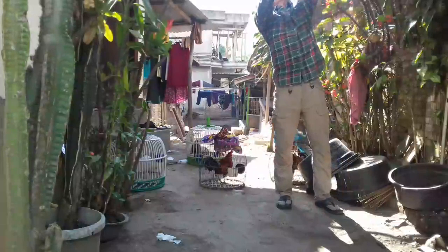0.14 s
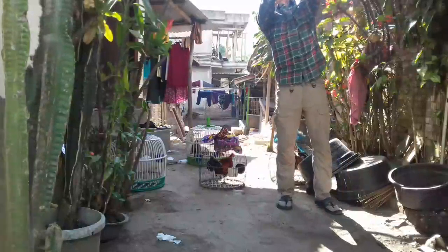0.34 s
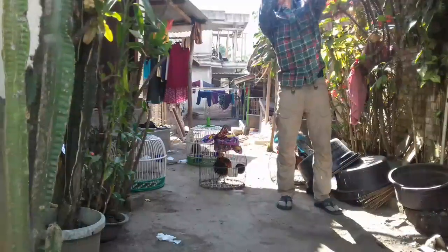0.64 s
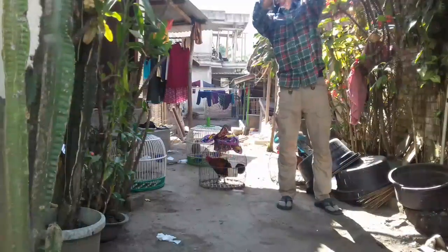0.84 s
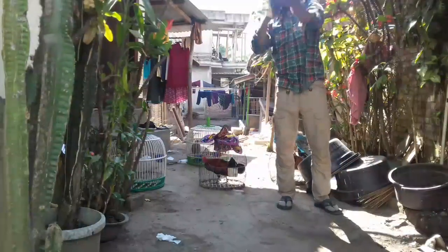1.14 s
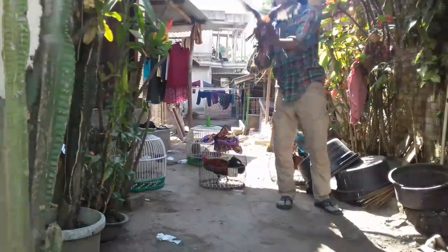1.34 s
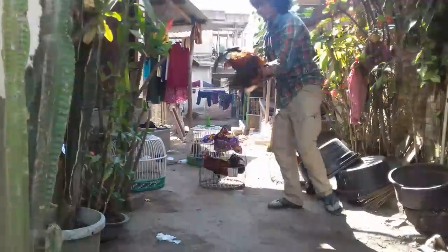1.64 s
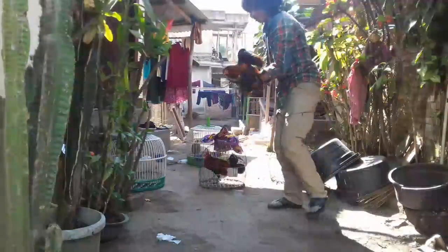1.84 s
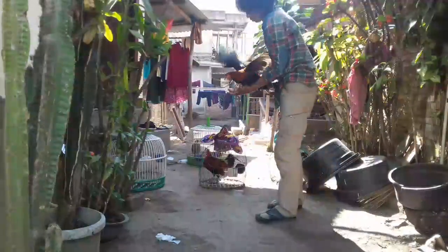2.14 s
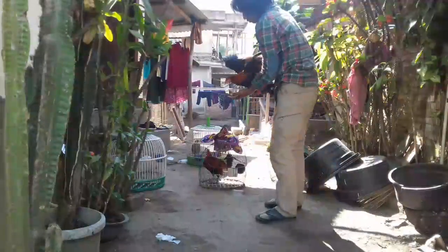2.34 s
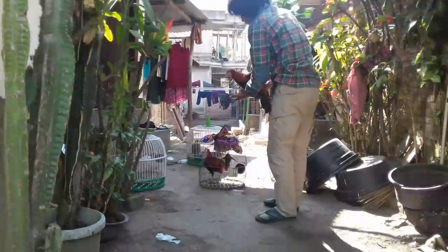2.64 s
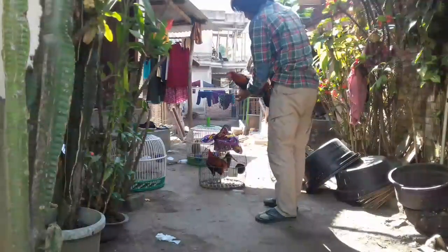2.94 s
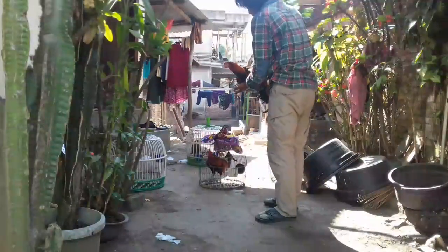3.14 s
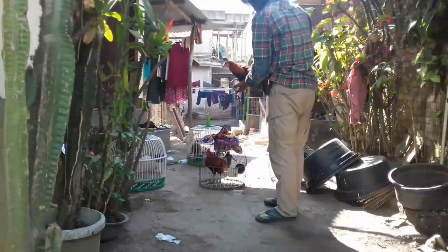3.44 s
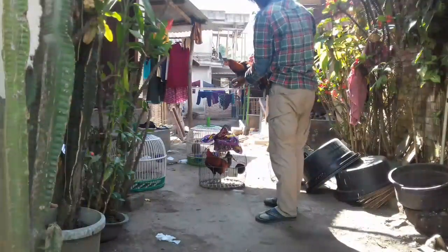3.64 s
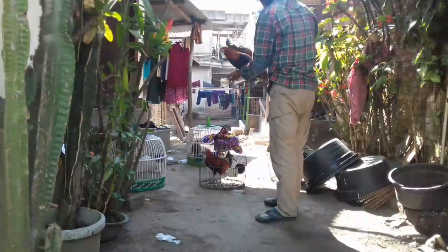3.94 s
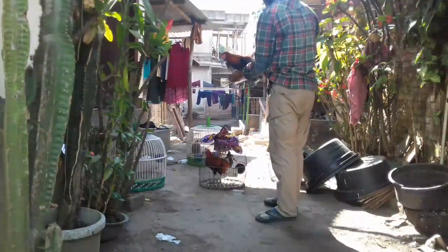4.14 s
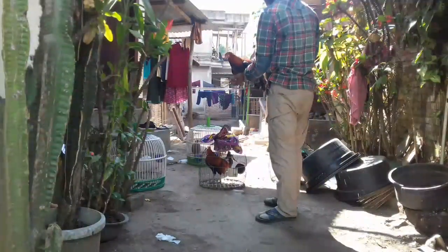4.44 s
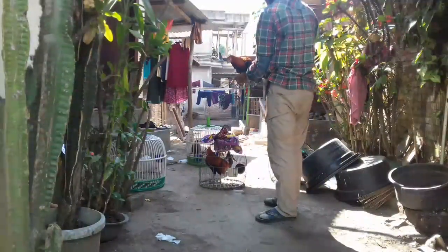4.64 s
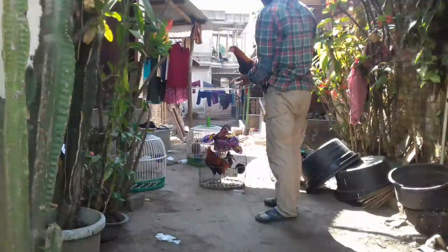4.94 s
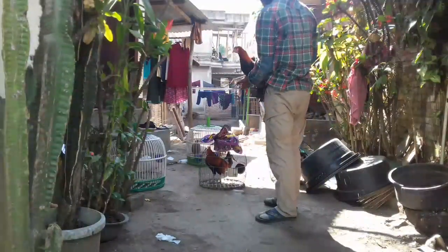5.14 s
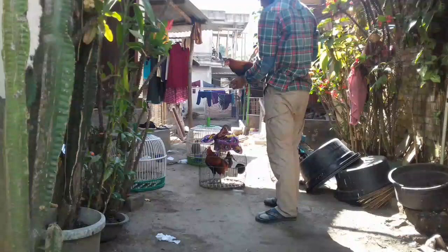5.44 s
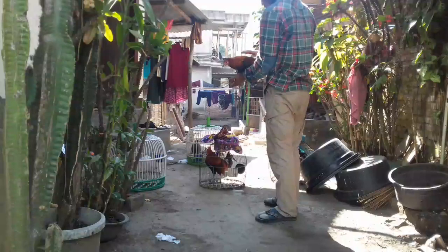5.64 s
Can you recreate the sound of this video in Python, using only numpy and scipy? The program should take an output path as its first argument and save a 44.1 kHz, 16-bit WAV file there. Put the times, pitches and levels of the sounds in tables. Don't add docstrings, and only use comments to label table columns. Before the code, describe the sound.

In a hard-walled yard, a bird held fairly close beats its wings with dry feather rattles and low air puffs, yelping, whistling and squawking for a second and a half. It then settles into spaced clucks, hoarser and quieter, ending in faint mutters. A second hen answers low and farther off, and thin chick peeps fall in pitch. Quiet town hum; a small microphone dulls the treble.

```python
import sys
import numpy as np
from scipy import signal
from scipy.fft import rfft, irfft, next_fast_len
from scipy.io import wavfile
from scipy.ndimage import uniform_filter1d

SR = 44100
rng = np.random.default_rng(int(sys.argv[2]) if len(sys.argv) > 2 else 0)


def put_to_file(sound):
    columns = np.atleast_2d(sound).T
    safe = np.clip(columns, -1, 1)
    whole_steps = np.round(safe * 32767)
    wavfile.write(sys.argv[1], SR, whole_steps.astype(np.int16))


def field_ratio(decibels):
    return 10 ** (np.asarray(decibels, dtype=float) / 20)


N = 254898

# (frequency [Hz], density [dB per Hz])
TOWN_SPECTRUM = [(25, -20), (45, 0), (80, -9), (135, 4.5), (195, -6.5), (300, 1.5), (600, -10.5),
                 (1500, -10), (2700, -14), (3700, -19), (4600, -23), (5600, -22), (9000, -25), (15400, -25)]
TOWN_DB = -61.5
# (time [s], level [dB])
FLOCK_STIR = [(0, -36), (.5, -43), (0.999, -41.5), (1.6, -54), (2.701, -51), (3.45, -75.5), (4.2, -56.5),
              (4.7, -65.5), (5.2, -54.5), (5.58, -72.5), (5.78, -48)]
# (time [s], level [dB], decay [s], feather resonance [Hz])
WING_STROKES = [(0, -44.5, 0.1, 1470), (0.034, -26.5, 0.034, 2590), (0.156, -22, 0.016, 3520),
                (0.203, -36.5, 0.15, 4500), (0.293, -27.5, 0.024, 2000), (0.377, -44.5, 0.025, 1485),
                (0.403, -34.5, 0.022, 1500), (0.476, -40.5, 0.02, 1840), (0.515, -49, 0.075, 3020),
                (0.609, -43, 0.037, 3000), (0.632, -32, 0.046, 1486), (0.769, -36, 0.1, 2500),
                (0.856, -26.5, 0.016, 2580), (2.133, -42, 0.013, 1530), (2.958, -48, 0.033, 3500),
                (3.781, -55, 0.086, 2240), (4.091, -43, 0.0091, 1990), (4.115, -48, 0.023, 250),
                (5.201, -55, 0.13, 1520)]
# (time [s], level [dB], length [s])
WING_GUSTS = [(0.106, -46.5, 0.27), (0.304, -45.5, 0.26), (0.592, -40, 0.22), (0.767, -41.5, 0.27),
              (1.102, -42, 0.1), (1.247, -50, 0.17), (1.493, -48, 0.11), (2.04, -54, 0.22)]
GUST_RISE_S, GUST_FALL_S = 0.03, 0.17
# (delay [s], level [dB])
WALL_ECHOES = [(.009, -7.5), (0.022, -4), (0.034, -6.5), (0.061, -11.5), (0.077, -17.5)]

# (time [s], level [dB], membrane rate [Hz], length [s])
YELPS = [
    (.036, -28.5, 809.4, 0.056),
    (.184, -18.5, 824, 0.03),
    (.290, -23.5, 846, 0.024),
    (.836, -21.5, 799, 0.026),
]
WHISTLES = [
    (.164, -17.5, 1649, 0.03),
    (.274, -26, 1570, 0.014),
    (4.998, -28.5, 963, 0.015),
]
CRACKED = [
    (1.026, -18, 1068, 0.057),
    (1.074, -22.5, 1048, 0.038),
]
SQUAWKS = [
    (1.19, -18, 882, 0.0796),
    (1.366, -19.5, 785.7, 0.0694),
]
SHRIEKS = [
    (1.568, -21.5, 739.4, 0.058),
]
CLUCKS = [
    (1.776, -28, 599, 0.048),
    (2.208, -29, 643.4, 0.047),
    (2.414, -28, 633, 0.041),
    (2.610, -27.5, 640, 0.048),
]
HOARSE = [
    (1.997, -32, 583.7, 0.056),
    (2.82, -32, 602, 0.043),
    (3.024, -37, 589.3, 0.052),
    (4.712, -42.5, 580, 0.033),
    (5.018, -33.5, 597, 0.015),
]
MUTTERS = [(3.26, -42, 612, 0.045), (3.485, -41, 637.6, 0.042), (3.718, -42.5, 623, 0.04),
           (3.963, -42, 723.5, 0.047), (4.198, -42, 650, 0.04), (4.443, -43.5, 630.4, 0.042),
           (5.458, -39.5, 627, 0.036), (5.723, -42.5, 586, 0.019)]
BARKS = [
    (5.241, -29, 409, 0.021),
]
# (time [s], level [dB], membrane rate [Hz], length [s])
HEN_CALLS = [(.38, -39.5, 353.8, 0.046), (.635, -41, 312.2, 0.053), (2.05, -37, 259, 0.038),
             (2.77, -47, 259.8, 0.049), (3.01, -42, 332.6, 0.055), (3.63, -42, 398.6, 0.065),
             (4.1, -45.5, 254, 0.024), (4.305, -43.5, 468, 0.073), (4.41, -50.5, 310, 0.062),
             (4.678, -42, 429, 0.065), (4.985, -46, 453.3, 0.058), (5.05, -47, 472, 0.059),
             (5.17, -52.5, 436, 0.068)]
HEN_PURRS = [
    (4.56, -60.5, 628, 0.2),
    (4.81, -62, 691, 0.1),
    (4.925, -53, 525, 0.074),
    (5.365, -51.5, 640, 0.042),
    (5.62, -51, 663, 0.05),
]
# (beak resonance [multiple of membrane rate], upper windpipe resonance [dB],
# rasp above 5 kHz [dB])
MOUTH = dict(whistle=(0.99, -38, -29), yelp=(1.77, -6, 0), squawk=(1.83, -5, -1.4), shriek=(1.95, -6, 3.7),
         cracked=(1.42, -7, -1.8), bark=(3.22, -8.5, -16), cluck=(2.024, -4.5, -20), hoarse=(2.23, -6, -27),
         mutter=(2, -2, -31), hen=(2.27, -22, -19), purr=(1.87, -13, -21))
GAPE_HZ_PER_DB, BRIGHT_DB_PER_DB = 14, 0.67
USUAL_DB = -30
TOP_HZ = 15500

# (time [s], level [dB], start pitch [Hz], length [s])
PEEPS = [(2.546, -60, 4090, 0.15), (2.888, -54.5, 4340, 0.093), (3.035, -54, 4300, 0.076),
         (3.134, -57, 4380, 0.078), (3.606, -56, 4060, 0.029), (3.945, -51, 4080, 0.022),
         (3.989, -47, 4490, 0.031), (4.156, -56.5, 4520, 0.069), (4.302, -56, 4620, 0.045),
         (4.473, -54, 4210, 0.053), (4.541, -51, 4080, 0.038), (4.635, -56, 4110, 0.081),
         (4.828, -53.5, 4340, 0.07), (4.899, -53, 4630, 0.052), (4.967, -54, 4610, 0.037)]
# (time [s], level [dB], start pitch [Hz], length [s])
TWITTERS = [(3.199, -59, 4060, 0.08), (3.26, -58.5, 4296, 0.074), (3.37, -57.5, 3960, 0.041),
            (3.78, -63, 3680, 0.061), (3.831, -65, 4130, 0.049), (4.41, -63, 3715, 0.082),
            (4.61, -65, 4420, 0.051), (4.74, -53, 3820, 0.033), (5.115, -58, 3950, 0.05)]
PEEP_FALL, TWITTER_FALL = 0.25, 0.089
BROOD_DB, BROOD_FOLLOWS = -65.5, 0.8
# (frequency [Hz], gain [dB])
MICROPHONE = [(30, -27), (150, -14), (500, 5.5), (4800, 2.5), (5600, -9.5), (6500, -12.5), (10000, -26.5),
              (16000, -44.5)]


def level(x, db):
    return x * field_ratio(db) / np.sqrt(np.mean(x ** 2) + 1e-18)


def colour(x, gain):
    size = next_fast_len(len(x))
    hz = np.arange(size // 2 + 1) * SR / size
    return irfft(rfft(x, size) * gain(hz), size)[:len(x)]


def curve(points):
    hz, db = np.transpose(points)
    return lambda f: field_ratio(np.interp(np.log(f + 1), np.log(hz), db))


def peak(f, hz, width_hz):
    return 1 / (1 + 1j * (f ** 2 - hz ** 2) / (f * width_hz + 1e-9))


def walk(size, rate):
    k = max(int(SR / rate), 1)
    smooth = uniform_filter1d(rng.standard_normal(size), k)
    return level(uniform_filter1d(smooth, k), 0)


def add(out, s, x):
    i = int(s * SR)
    out[i:i + len(x)] += x[:N - i]


def swell(t, length, rise, fall):
    attack = 1 - np.exp(-(t / rise) ** 2)
    return attack * np.exp(-(np.clip(t - length + fall, 0, None) / fall) ** 2)


def town():
    s, db = np.transpose(FLOCK_STIR)
    muddle = colour(rng.standard_normal(N), lambda f: peak(f, 750, 900) ** 2)
    muddle = level(muddle * field_ratio(2.5 * walk(N, 20)), -4)
    muddle = muddle * field_ratio(np.interp(np.arange(N) / SR, s, db))
    return level(colour(rng.standard_normal(N), curve(TOWN_SPECTRUM)), TOWN_DB) + muddle


def wing_feathers():
    out, t = np.zeros(N), np.arange(SR // 5) / SR
    for s, db, decay, hz in WING_STROKES:
        unevenness_db = 2.5 * rng.exponential(size=len(t)) + 3 * walk(len(t), 120)
        rattle = rng.standard_normal(len(t)) * field_ratio(unevenness_db)
        rattle = colour(rattle, lambda f: peak(f, hz, 3 * hz) ** 2 + 0.063)
        add(out, s, level(rattle, db) * (1 - np.exp(-t / 0.004)) * np.exp(-t / decay))
    return out


def wing_air():
    t, push = np.arange(N) / SR, np.zeros(N)
    for s, db, length in WING_GUSTS:
        push += field_ratio(db) * swell(np.clip(t - s, 0, None), length, GUST_RISE_S, GUST_FALL_S)
    air = colour(rng.standard_normal(N), lambda f: peak(f, 215, 220) ** 2 + 0.029 * peak(f, 60, 60))
    return level(air, 0) * push * field_ratio(0.31 * walk(N, 36))


def yard(x, wet_db, echo_db):
    t = np.arange(SR) / SR
    hiss = rng.standard_normal(SR) * (1 - np.exp(-t / 0.0013))
    low = colour(hiss, lambda f: 1 / (1 + (f / 2500) ** 4))
    tail = low * field_ratio(-60 * t / 0.45) + (hiss - low) * field_ratio(-60 * t / 0.4)
    tail = tail * field_ratio(wet_db) / np.sqrt(np.sum(tail ** 2))
    for delay, db in WALL_ECHOES:
        add(tail, delay, field_ratio([db + echo_db]))
    tail[0] = 1
    return signal.fftconvolve(x, tail)[:N]


def voice(calls, mouth, count, limp, rough, breath_db, scoop, sag, rise, width_hz, chest_db, throat):
    out = np.zeros(N)
    beak_ratio, upper_rest_db, rasp_db = mouth
    throat_hz, throat_db = throat
    for s, db, hz, length in calls:
        beak_hz = beak_ratio * hz + GAPE_HZ_PER_DB * (db - USUAL_DB)
        upper_db = upper_rest_db + BRIGHT_DB_PER_DB * (db - USUAL_DB)
        size = int((length + 0.03) * SR)
        t = np.arange(size) / SR
        hiss = rng.standard_normal(SR // 4)[:size]
        wobble = walk(SR // 4, 254)[:size]
        flutter = np.array([walk(SR // 4, 77.4)[:size] for _ in range(4)])
        shape = swell(t, length, rise, 0.011)
        opening = 1 - scoop * np.exp(-t / rise)
        jitter = rough * (0.07 * wobble + 0.05 * flutter[0])
        pitch = hz * (opening - sag * np.clip(t - length / 2, 0, length) + jitter)
        turn = 2 * np.pi * np.cumsum(pitch) / SR / count
        k = np.arange(1, int(TOP_HZ * count / hz))[:, None]

        def pipe(f, opening, effort):
            def ring(hz, width_hz):
                return 1 / (1 + ((f ** 2 - hz ** 2) / (f * width_hz + 1)) ** 2)

            upper = ring(4320, 800) ** 2 + field_ratio(2 * throat_db) * ring(throat_hz, 650) ** 2
            rasp = field_ratio(-0.5) * ring(5180, 330) ** 2 + field_ratio(-25.5) * (f > 5000)
            upper = upper + field_ratio(2 * rasp_db) * rasp
            lower = ring(beak_hz * opening, width_hz) ** 2 + field_ratio(2 * chest_db) / (1 + (f / 900) ** 6)
            power = lower + field_ratio(2 * upper_db) * effort ** 3 * upper
            return np.sqrt(power) / (1 + (0.38 * hz / (f + 1)) ** 6)

        strength = np.where(k % count, limp, 1) * pipe(k * pitch / count, opening, shape)
        strength = strength * field_ratio(rough * 8 * flutter)[k[:, 0] % 4]
        pulses = (strength * np.cos(k * turn + 0.2126 * k ** 2)).sum(axis=0)
        breath = colour((1 + np.cos(count * turn)) * hiss, lambda f: pipe(f, 0.87, 0.58))
        sound = (level(pulses, 0) + level(breath, breath_db)) * shape
        add(out, s, sound * field_ratio(db) / np.sqrt(np.sum(sound ** 2) / np.sum(shape ** 2)))
    return out


def held_bird():
    out = voice(YELPS, MOUTH["yelp"], count=2, limp=0.08, rough=0.25, breath_db=-12, scoop=0.2, sag=2.5,
                rise=0.013, width_hz=600, chest_db=-15, throat=(3700, -6))
    out += voice(WHISTLES, MOUTH["whistle"], count=2, limp=0.02, rough=0.06, breath_db=-22, scoop=0.12, sag=0,
                 rise=0.012, width_hz=600, chest_db=-30, throat=(3300, -6))
    out += voice(CRACKED, MOUTH["cracked"], count=3, limp=0.6, rough=0.22, breath_db=-10, scoop=0.28, sag=0.3,
                 rise=0.013, width_hz=750, chest_db=-16, throat=(3150, -5))
    out += voice(SQUAWKS, MOUTH["squawk"], count=2, limp=0.28, rough=0.32, breath_db=-6, scoop=0.22, sag=2,
                 rise=0.013, width_hz=800, chest_db=-15, throat=(3400, -1))
    out += voice(SHRIEKS, MOUTH["shriek"], count=2, limp=0.15, rough=0.3, breath_db=-8, scoop=0.2, sag=1.1,
                 rise=0.015, width_hz=800, chest_db=-15, throat=(3600, -4))
    out += voice(CLUCKS, MOUTH["cluck"], count=2, limp=0.3, rough=0.28, breath_db=-8, scoop=0.2, sag=0.6,
                 rise=0.016, width_hz=600, chest_db=-13, throat=(2750, -10))
    out += voice(HOARSE, MOUTH["hoarse"], count=2, limp=0.6, rough=0.38, breath_db=-5, scoop=0.17, sag=0.6,
                 rise=0.012, width_hz=750, chest_db=-12, throat=(2800, -7))
    out += voice(MUTTERS, MOUTH["mutter"], count=2, limp=0.95, rough=0.28, breath_db=-7, scoop=0.14, sag=0.3,
                 rise=0.0025, width_hz=700, chest_db=-5, throat=(2550, -2))
    out += voice(BARKS, MOUTH["bark"], count=1, limp=1, rough=0.1, breath_db=-14, scoop=0.06, sag=0,
                 rise=0.008, width_hz=800, chest_db=-14, throat=(2450, -2))
    return out


def far_hen():
    out = voice(HEN_CALLS, MOUTH["hen"], count=2, limp=0.3, rough=0.35, breath_db=-7, scoop=0.3, sag=0.5,
                rise=0.028, width_hz=400, chest_db=-10, throat=(2500, -20))
    out += voice(HEN_PURRS, MOUTH["purr"], count=1, limp=0, rough=0.15, breath_db=-14, scoop=0.12, sag=0,
                 rise=0.018, width_hz=600, chest_db=-30, throat=(2500, -20))
    return out


def hidden_brood():
    stir_s, stir_db = np.transpose(FLOCK_STIR)
    calls = []
    for when, loud, high, long in rng.random((140, 4)):
        s = when * N / SR
        calm_db = min(np.interp(s, stir_s, stir_db) + 50, 0)
        db = BROOD_DB + BROOD_FOLLOWS * calm_db + 6 * loud
        calls.append((s, db, 3700 + 900 * high, 0.066 + 0.059 * long))
    return calls


def chicks():
    out, t = np.zeros(N), np.arange(SR // 5) / SR
    groups = ((PEEPS, PEEP_FALL), (TWITTERS, TWITTER_FALL), (hidden_brood(), 2 * TWITTER_FALL))
    for calls, fall in groups:
        for s, db, top_hz, length in calls:
            glide = 1 - fall * np.clip(t / length, 0, 1.2) ** 1.4
            hz = top_hz * glide + 70 * walk(len(t), 250)
            whistle = np.sin(2 * np.pi * np.cumsum(hz) / SR)
            add(out, s, field_ratio(db) * whistle * swell(t, length, 0.008, 0.012))
    return out


def scene():
    heard = yard(wing_feathers() + held_bird(), wet_db=-7.5, echo_db=-6)
    heard = heard + yard(far_hen(), wet_db=-8, echo_db=-10)
    heard = heard + yard(chicks(), wet_db=4, echo_db=-9)
    return (colour(heard, curve(MICROPHONE)) + wing_air() + town())[None]


def band_limit(x):
    return signal.sosfilt(signal.butter(12, 16060, fs=SR, output="sos"), x)


def record(dry):
    top_cut = signal.ellip(8, 0.2, 60, TOP_HZ, fs=SR, output="sos")
    mix = signal.sosfilt(top_cut, dry)
    return band_limit(mix)


dry = scene()
out = record(dry)
put_to_file(out)
```